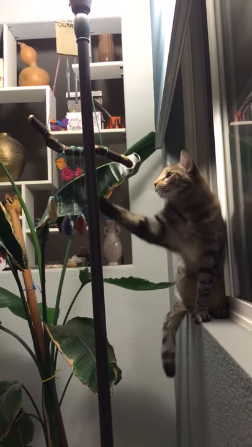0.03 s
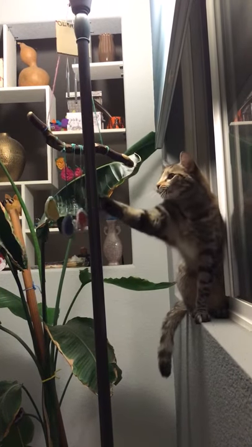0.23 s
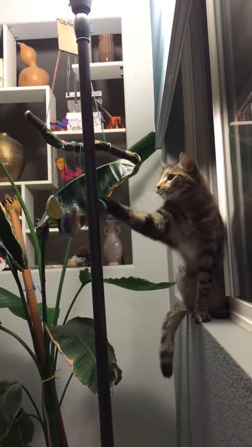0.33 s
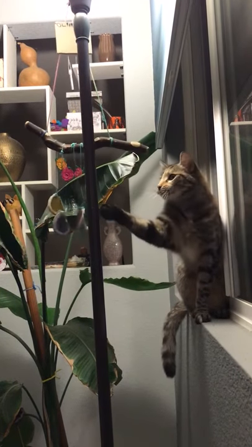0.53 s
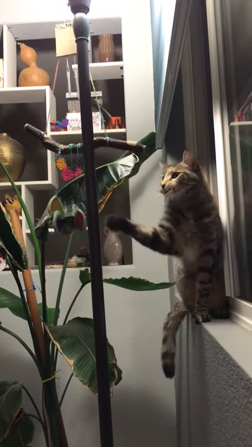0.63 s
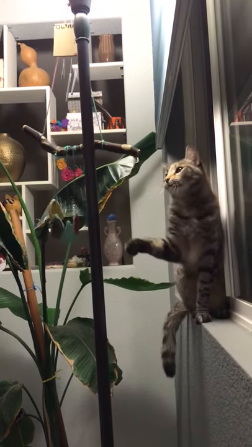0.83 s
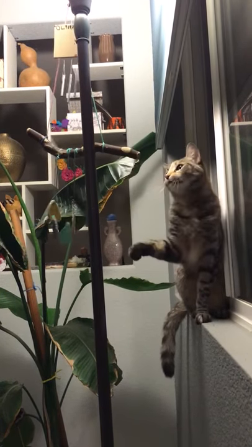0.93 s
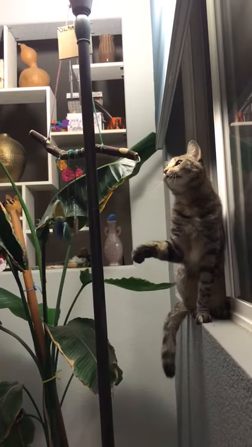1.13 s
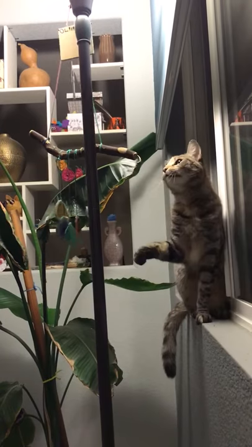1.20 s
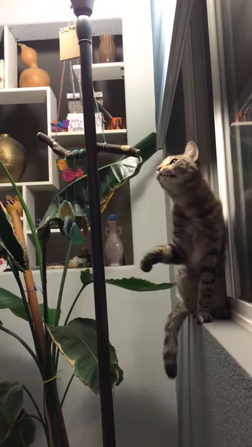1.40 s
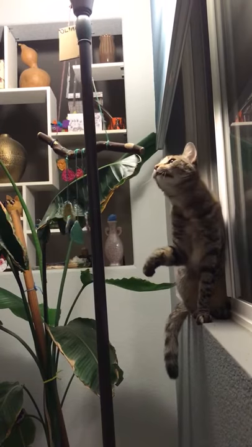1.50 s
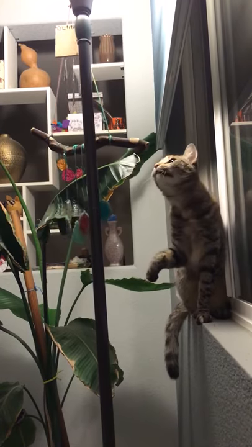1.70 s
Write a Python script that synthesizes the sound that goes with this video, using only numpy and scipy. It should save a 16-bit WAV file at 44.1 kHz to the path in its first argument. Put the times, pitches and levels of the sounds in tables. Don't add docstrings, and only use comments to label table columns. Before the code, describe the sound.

Metal wind chime pieces clatter brightly in a small quiet room; they hit a pole twice strongly, leaving a thin wavering tone beneath sparse fading ticks, with low hum and faint hiss, picked up nearby by a phone.

```python
import sys
import numpy as np
from scipy import signal
from scipy.fft import rfft, irfft
from scipy.io import wavfile
from scipy.ndimage import uniform_filter1d

SR = 44100
rng = np.random.default_rng(int(sys.argv[2]) if len(sys.argv) > 2 else 0)


def dump(signal):
    limited = np.clip(np.atleast_2d(signal).T, -1, 1)
    pcm = np.round(limited * 32767).astype(np.int16)
    wavfile.write(sys.argv[1], SR, pcm)


def volts_from_db(level):
    exponent = np.asarray(level, float) / 20
    return 10 ** exponent


N = 77175

# start_s, first_spot_db, second_spot_db, softness (times), stand_db
BLOWS = [
    (.3143, 1, -58, 2.5, 4.5),
    (0.393, -12, -38.5, 2.5, 11),
    (0.6317, -60, -3, 5, -7.5),
    (.819, -63, -72.5, 3.3, 54.5),
]


def read(points, hz):
    f, value = np.transpose(points)
    return np.interp(np.log(hz + 1), np.log(f + 1), value)


def add(mix, start_s, sound):
    part = mix[round(start_s * SR):][:len(sound)]
    part += sound[:len(part)]


def modes(hz, db, t60, seconds, rise_s):
    t = np.arange(round(seconds * SR))[:, None] / SR
    sign = (-1.) ** np.arange(len(hz))
    rings = volts_from_db(db - 60 * t / t60) * np.sin(2 * np.pi * hz * t) * sign
    rise = 1 - np.exp(-(t[:, 0] / rise_s) ** 2)
    return rings.sum(1) * rise


def coloured(points, size):
    spectrum = rfft(rng.standard_normal(size))
    gain = volts_from_db(read(points, np.fft.rfftfreq(size, 1 / SR)))
    noise = irfft(spectrum * gain, size)
    return noise / noise.std()


def hum():
    # pitch_hz, density_db (per Hz)
    rumble = [(30, -32.5), (56, -2.5), (180, -10), (300, -11.5), (520, -22), (1500, -28.5), (4000, -43),
              (16000, -50)]
    hiss = [(3000, -19), (7000, -9.5), (12600, -29.5), (13300, 1.5), (14000, -18)]
    # pitch_hz, level_db
    mains = [(120, -64.5), (180, -78)]
    t = np.arange(N) / SR
    out = volts_from_db(-60.5) * coloured(rumble, N) + volts_from_db(-79) * coloured(hiss, N)
    for hz, db in mains:
        drift = uniform_filter1d(rng.standard_normal(N), 4000)
        phase = .5 * drift / drift.std()
        out = out + volts_from_db(db) * np.sin(2 * np.pi * hz * t + phase)
    return out


def ticks():
    # start_s, peak_db, centre_hz
    contacts = [(.1945, -55, 5900), (.2025, -55, 7250), (.2205, -50, 7160), (.2258, -4, 6720),
                (.2437, -6.5, 9100), (.2583, -12, 6560), (0.5433, -30, 4600), (.5632, -15, 6826),
                (.5885, -26, 6000), (0.6109, -11, 5330), (.792, -31, 5840), (.9315, -25.5, 4200),
                (1.184, -27.5, 6500), (1.208, -50, 6000), (1.2822, -21.5, 8370), (1.311, -46, 550),
                (1.3557, -22, 7950), (1.4253, -25, 11800), (1.434, -15.5, 9140), (1.479, -42, 4260),
                (1.6752, -28, 4550), (.3144, -6.5, 7050),
                (.2281, -17, 7700), (.2461, -24, 8000), (.2607, -16.5, 6300), (0.6385, -18, 11000),
                (.9339, -26, 14400), (.2375, -29.5, 5800), (.9316, -14.5, 12800), (1.2824, -21, 12400),
                (.6111, -11.5, 7400), (1.4402, -42.5, 6440), (1.4461, -35, 7850), (1.4583, -42, 6000),
                (1.4372, -30, 6700), (1.4432, -35, 5400), (1.4495, -40, 6200), (1.4531, -40, 5200),
                (.9372, -37, 6900), (.9418, -35, 6000), (1.6, -62, 4500), (0.37, -38, 7300),
                (.2259, -12.5, 15500), (.2438, -15, 19000), (1.4343, -26.5, 6530), (.5634, -21.5, 4150),
                (.5887, -38.5, 14500)]
    # share_of_centre, level_db
    body_shape = [(.55, -14.5), (.76, -3), (1, 0), (1.2, -5.5), (1.42, -1.5)]
    body_t60, body_gain_db = 0.0039, -10
    out = np.zeros(N)
    impulse = np.r_[1., np.zeros(999)]
    shares, shape_db = np.transpose(body_shape)
    for start_s, peak_db, centre_hz in np.array(contacts):
        edges_hz = [0.49 * centre_hz, min(1.5 * centre_hz, 18500)]
        click = signal.sosfilt(signal.butter(2, edges_hz, "band", fs=SR, output="sos"), impulse)
        pitch_luck, level_luck = rng.uniform(-1, 1, (2, len(shares)))
        body_hz = np.minimum(centre_hz * shares * (1 + .06 * pitch_luck), 17000)
        body = modes(body_hz, shape_db + 3 * level_luck, body_t60, 1000 / SR, .0001)
        add(out, start_s, volts_from_db(peak_db) * (click / abs(click).max() + volts_from_db(body_gain_db) * body))
    return out


def pendant_rings():
    pendant_hz = [13655, 11257, 13435, 15580]
    # gap_to_twin_hz, twin_db, t60_s
    pendants = [(30.5, -24, 0.057), (70.5, -17, 0.046), (-76, -7.5, 0.09), (59.5, -10, .06)]
    # start_s, then the peak_db of each pendant
    touches = [(0.2031, -54, -89.5, -60, -92), (.2259, -6.5, -60, -36, -46), (.2438, 0, -48, -43, -41),
               (.2584, -12, -61, -50, -53), (0.562, -31.5, -31.5, -59, -35), (0.6105, -12.5, -35, -30, -55),
               (.661, -24, -53, -58, -70), (0.687, -26, -55, -42, -68), (0.9307, -63, -28.5, -29, -41.5),
               (1.183, -74.5, -44.5, -49.5, -71), (1.2815, -28, -43.5, -25, -55),
               (1.303, -40, -73, -46, -78), (1.326, -36, -77, -58, -80), (1.385, -47, -80, -65, -85),
               (1.3565, -33, -77, -60, -71), (1.4254, -23.5, -78, -39, -62), (1.434, -38, -15, -29, -59)]
    gap_hz, twin_db, t60 = np.transpose(pendants)
    hz = np.c_[pendant_hz, pendant_hz - gap_hz].ravel()
    out = np.zeros(N)
    for start_s, *db in touches:
        rise_s = .0005 if max(db) > -33 else .002
        level_db = np.c_[db, db + twin_db].ravel()
        add(out, start_s, modes(hz, level_db, np.repeat(t60, 2), .3, rise_s))
    return out


def pole():
    long_hz = [3334, 3465, 3481.5, 3508, 3588.5, 3622, 3929, 3979, 4568, 4604, 4581, 4638]
    mid_hz = [4484, 4936, 5529, 5649, 5981, 8366, 6838, 6872, 7122, 7568, 8250, 8400]
    high_hz = [9652, 9781, 9884, 9964, 10021, 10126, 10246, 10580, 10672, 11034, 11250, 11670, 12351, 15298]
    side_hz = [3950, 4460, 4972, 5495, 5580, 6756, 6795, 6925, 8195, 8305, 8861, 9458]
    top_hz = [10340, 10910, 11400, 11830, 12060, 12470, 13150, 13610, 13830, 14185, 14650, 15600]
    stand_hz = [544, 570, 930, 1012, 1330, 1370, 1583, 1938, 2180, 2290, 2347, 2584, 2686, 3036]
    # t60_s, first_spot_peak_db, second_spot_peak_db
    long_rings = [(2.5, -47.5, -52.5), (1.1, -54.5, -61.5), (2.15, -41.5, -32.5), (2.45, -42.5, -33.5),
                  (2.35, -43.5, -30), (2.35, -40.5, -40), (0.95, -36, -24.5), (0.74, -37.5, -30.5),
                  (0.71, -25.5, -45.5), (0.42, -27.5, -26), (1.2, -54.5, -36), (0.64, -28.5, -19.5)]
    mid_rings = [(0.41, -38, -50.5), (0.2045, -43.5, -59), (0.15, -15, -16), (0.12, -23, -15.5),
                 (.2, -53.5, -49.5), (0.31, -27, -48), (0.15, -16, -33), (0.16, -24.5, -14),
                 (0.1515, -53.5, -47), (0.077, -52.5, -51), (0.17, -25, -49.5), (0.11, -27.5, -21.5)]
    high_rings = [(.15, -25, -45), (0.32, -18, -10.5), (0.39, -31.5, -20.5), (0.17, -47, -25),
                  (0.26, -23, -20), (0.11, -35, -33.5), (0.051, -24.5, -19), (.22, -24, -22),
                  (.2, -33.5, -22.5), (0.24, -28, -26.5), (0.2, -36, -46), (0.19, -32.5, -36.5),
                  (0.25, -35.5, -61.5), (.22, -41.5, -31.5)]
    side_rings = [(1, -36, -43), (.3, -41.5, -55.5), (.2, -43.5, -58.5), (0.05, -28.5, -39.5),
                  (0.17, -32.5, -23.5), (.22, -27.5, -36), (0.25, -26.5, -29), (.15, -35.5, -26.5),
                  (0.084, -34, -45), (0.086, -31, -36), (.19, -41.5, -43), (0.37, -41.5, -42)]
    top_rings = [(.2, -42.5, -46.5), (.25, -44.5, -42), (0.1185, -42, -36.5), (0.23, -35.5, -33.5),
                 (.3, -44, -54), (0.201, -46, -47), (.14, -35.5, -50.5), (.18, -41, -58.5), (.25, -53, -57),
                 (.2, -44.5, -38), (.12, -44, -55.5), (.2, -52.5, -53)]
    stand_rings = [(0.26, -45.5, -57.5), (0.24, -47.5, -46.5), (0.065, -46, -52), (0.12, -42.5, -60),
                   (0.1, -41.5, -62.5), (0.13, -44.5, -61.5), (0.065, -58, -64), (0.15, -54.5, -52.5),
                   (0.053, -40, -53.5), (0.22, -58, -32), (0.098, -41, -57), (0.11, -43, -45.5),
                   (0.091, -36.5, -52.5), (0.14, -42.5, -57)]
    # pitch_hz, level_db
    crack = [(400, -18), (900, -7.5), (2500, -6), (5000, 9), (10000, -6), (13000, -10.5), (15400, -13),
             (16200, -30.5)]
    crack_db, crack_t60 = -22, 0.12
    grip_s, grip_db = .6318, -23
    tube_hz = np.concatenate([long_hz, mid_hz, high_hz, side_hz, top_hz])
    tube_rings = np.concatenate([long_rings, mid_rings, high_rings, side_rings, top_rings])
    tube, stand = np.c_[tube_hz, tube_rings], np.c_[stand_hz, stand_rings]
    out = np.zeros(N)
    crack_t = np.arange(6000) / SR
    for start_s, first_db, second_db, softness, stand_db in BLOWS:
        blow_db = max(first_db, second_db)
        since_grip = np.arange(N - round(start_s * SR) + 1) / SR + start_s - grip_s
        damped = volts_from_db(grip_db * (start_s < grip_s - .01) * np.clip(since_grip / .004, 0, 1))
        dull_db_per_oct = -16.5 * (stand_db > 20)
        bodies = ((tube.T, 0, softness * .0002), (stand.T, stand_db, .0015))
        for (hz, t60, a_db, b_db), extra_db, rise_s in bodies:
            db = np.maximum(first_db + a_db, second_db + b_db) + extra_db
            db = db + dull_db_per_oct * np.log2(hz / hz[0])
            db = db - 10.5 * (t60 > .4) * (blow_db < -6)
            ring = modes(hz, db, t60, N / SR - start_s, rise_s)
            add(out, start_s, ring * damped[:len(ring)])
        fade = volts_from_db(crack_db + blow_db - 60 * crack_t / crack_t60)
        add(out, start_s, coloured(crack, len(crack_t)) * fade)
    return out


def flutter(x):
    # low_hz, high_hz
    steady_hz = (3290, 4750)
    hz, t, z = signal.stft(x, SR, nperseg=512, noverlap=384)
    patches = rng.standard_normal((len(t), len(hz)))
    patches = uniform_filter1d(patches, size=6, axis=0)
    patches = uniform_filter1d(patches, size=2, axis=1)
    loose = (hz < steady_hz[0]) | (hz > steady_hz[1])
    from_blow_s = abs(t[:, None] - np.transpose(BLOWS)[0]).min(1, keepdims=True)
    loose = loose * np.clip(from_blow_s / .02 - .4, 0, 1)
    gain = volts_from_db(3 * loose * patches / patches.std()).T
    return signal.istft(z * gain, SR, nperseg=512, noverlap=384)[1][:N]


def room(x):
    # pitch_hz, t60_s
    room_t60 = [(500, 1), (2000, 0.55), (5000, 0.39), (9000, 0.43), (14000, 0.31)]
    taps = np.zeros(SR)
    at = np.arange(150, SR - 20, 20)
    taps[at + rng.integers(0, 20, len(at))] = rng.choice([-1., 1.], len(at))
    hz, t, z = signal.stft(taps, SR, nperseg=128)
    decay = volts_from_db(-60 * t / read(room_t60, hz)[:, None])
    tail = signal.istft(z * decay, SR, nperseg=128)[1]
    return signal.fftconvolve(x, tail / np.linalg.norm(tail))[:N]


def scene():
    # delay_s, level_db
    near_echoes = [(.0011, -17.5), (.0067, -23.5), (.011, -19.5), (.0235, -19.5)]
    floor = hum()
    tick, ring, metal = ticks(), pendant_rings(), flutter(pole())
    mix = tick + ring + metal
    add(mix, 0.0022, volts_from_db(-9) * (tick + 0.56 * ring))
    for k, (delay_s, db) in enumerate(near_echoes):
        add(mix, delay_s, (-1) ** k * volts_from_db(db) * (tick + 0.2806 * ring))
    mix = mix + room(volts_from_db(-10) * tick + volts_from_db(-17.5) * ring + volts_from_db(-13) * metal)
    return (mix + floor)[None]


def low_pass(x):
    return signal.sosfilt(signal.butter(12, 17150, fs=SR, output="sos"), x)


def record(dry):
    duck_from_db, duck_share, recover_db_per_s = -26, 0.098, 1.5
    power_db = 10 * np.log10(abs(uniform_filter1d(dry[0] ** 2, 800)) + 1e-12)
    fall_db = np.arange(N) * recover_db_per_s / SR
    held_db = np.maximum.accumulate(power_db + fall_db) - fall_db
    over_db = np.maximum(held_db - duck_from_db, 0)
    gain_db = duck_share * (over_db.max() - uniform_filter1d(over_db, 400)) - 1.5
    ducked = dry * volts_from_db(gain_db)
    limited = signal.oaconvolve(ducked, signal.firwin(101, 16400, fs=SR)[None], "same")
    return low_pass(limited)


dry = scene()
out = record(dry)
dump(out)
```